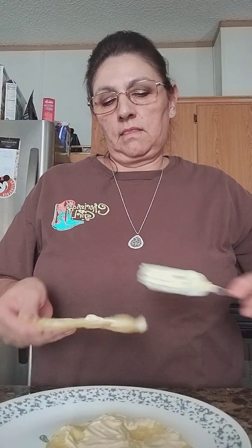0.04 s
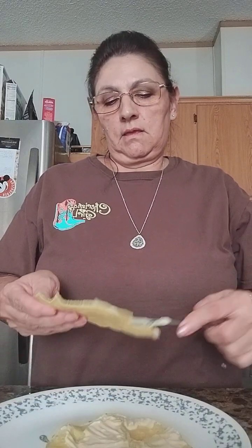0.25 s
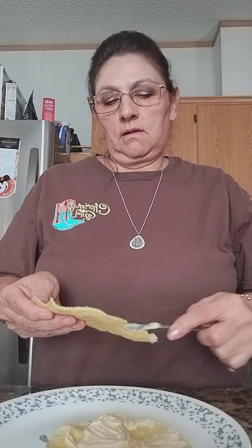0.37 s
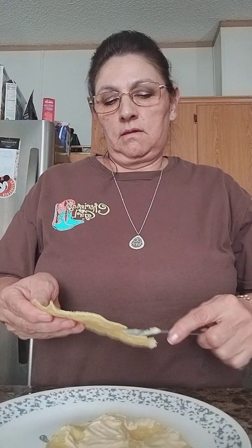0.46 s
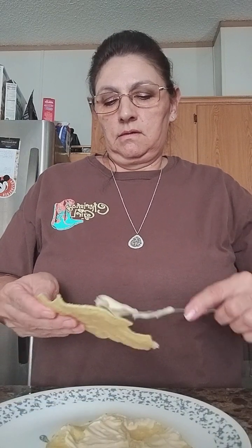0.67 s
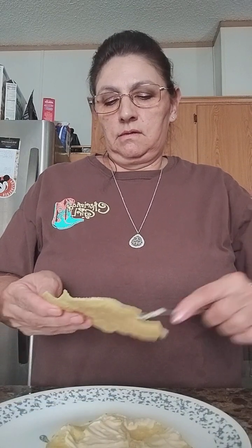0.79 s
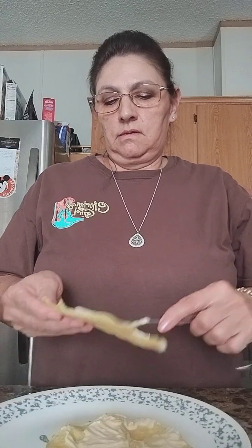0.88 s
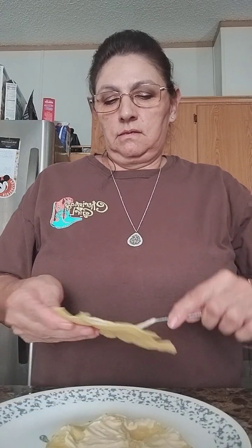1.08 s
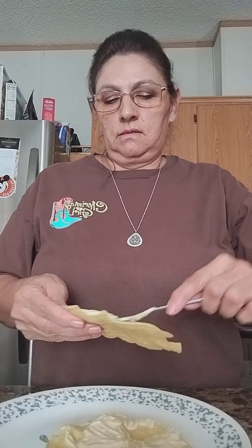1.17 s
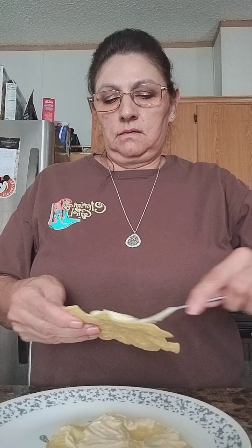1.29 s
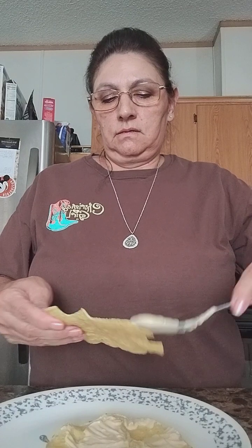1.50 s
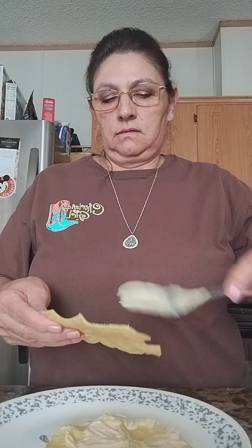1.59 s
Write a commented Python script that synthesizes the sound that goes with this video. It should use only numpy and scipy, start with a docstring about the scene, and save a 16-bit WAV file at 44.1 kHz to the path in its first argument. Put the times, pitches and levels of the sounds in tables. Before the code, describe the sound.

Close up in a small kitchen, quick spoon strokes rasp a brittle fried shell, stop briefly, then return softer with tiny crumb ticks and a sharp snap near the end, over low air noise.

```python
"""Short strokes of a metal spoon spread a soft paste over a crisp fried shell, close to a phone in a kitchen.
Each stroke is a rush of tiny catches that sound the shell, ring the spoon and hiss as grit. Crumbs snap as
short noise bursts, paste crackles as sparse ticks, the spoon's edge rasps through high resonances and the
shell flexes with dull bumps of low noise. The small room answers briefly, over steady low noise and hum."""
import sys
import numpy as np
from scipy import signal
from scipy.fft import rfft, irfft
from scipy.io import wavfile
from scipy.ndimage import uniform_filter1d

SR = 44100
rng = np.random.default_rng(int(sys.argv[2]) if len(sys.argv) > 2 else 0)


def to_wav(sig):
    """Store sig (one row per channel, or 1-D mono) as 16-bit WAV at the path in sys.argv[1].

    Samples outside -1..1 are clipped; the rate is SR.
    """
    pcm = np.clip(np.atleast_2d(sig), -1, 1) * 32767
    pcm = np.round(pcm).astype(np.int16)
    wavfile.write(sys.argv[1], SR, pcm.T)  # frames by channels


N = 72765

# bright colour of snapping crumbs and paste ticks: (frequency [Hz], relative level [dB])
TICK_SPECTRUM = [(1000, -18), (4000, -27), (5500, -8.5), (7200, -1), (8800, 5), (10500, -4.5), (12500, -17),
                 (16000, -14.5)]


def undb(db):
    """Decibels to gain."""
    return 10 ** (np.asarray(db) / 20)


def unit(x):
    """Scale to rms 1."""
    return x / np.sqrt(np.mean(x ** 2))


def times():
    """Time of each sample in seconds."""
    return np.arange(N) / SR


def freqs():
    """Frequencies of the filter grid in Hz."""
    return np.arange(N + 1) * SR / (2 * N)


def spectrum(x):
    """Spectrum on the filter grid, padded so that filters do not wrap round."""
    return rfft(x, 2 * N)


def through(x, response):
    """Filter by a frequency response."""
    return irfft(spectrum(x) * response)[..., :N]


def colour(points):
    """Causal (minimum-phase) response through (Hz, dB) points."""
    hz, db = np.array(points, float).T
    level_db = np.interp(np.log(freqs() + 1), np.log(hz), db)
    cepstrum = irfft(np.log(undb(level_db)))
    # folding the cepstrum forward in time makes the response causal
    cepstrum[1:N] *= 2
    cepstrum[N + 1:] = 0
    return np.exp(rfft(cepstrum))


def resonate(modes):
    """Summed response of damped resonances; a wider one dies away sooner."""
    s = 1j * freqs()
    return sum(undb(db) * s * width / (s * s + s * width + hz * hz) for hz, width, db in modes)


def normal(response):
    """Scale a response so that it keeps the power of white noise."""
    return response / np.sqrt(np.mean(np.abs(response) ** 2))


def roll_off(hz, order=4):
    """Smooth (Butterworth) low-pass response of even order."""
    s, response = 1j * freqs() / hz, 1
    for k in range(order // 2):
        damping = 2 * np.sin(np.pi * (2 * k + 1) / (2 * order))
        response = response / (s * s + damping * s + 1)
    return response


def shifted(response, semitones):
    """The same response, moved up or down in pitch."""
    return np.interp(freqs() / 2 ** (semitones / 12), freqs(), response)


def swell(at, width):
    """A smooth bell in time; width is its standard deviation in seconds."""
    return np.exp(-.5 * ((times() - at) / width) ** 2)


def background():
    """Low air noise and appliance hum; the noise is alike at both ports in the bass and spreads above."""
    # colour of the air noise: (frequency [Hz], relative level [dB])
    air_spectrum = [(25, -31), (45, -15), (62, -8.5), (80, -3.5), (110, -6), (150, 0.5), (230, -1),
                    (380, 4), (480, -7.5), (800, -7), (1500, -15), (3000, -17), (6000, -29), (9000, -25),
                    (12000, -32.5), (16000, -33)]
    # appliance hum: (frequency [Hz], level [dB])
    hum_tones = [(120, -78.5), (240, -71.5)]
    air_db, wide_hz, left_db = -63.5, 800, -3.0

    t, tone = times(), normal(colour(air_spectrum))
    apart = freqs() / (freqs() + wide_hz)
    mid = through(rng.standard_normal(N), tone)
    side = through(rng.standard_normal(N), tone * apart)
    air = undb(air_db) * np.array([undb(left_db) * (mid + side), mid - side])
    hum = sum(undb(db) * np.sqrt(2) * np.sin(2 * np.pi * (hz * t + rng.random())) for hz, db in hum_tones)
    return air + hum


def snaps(shell):
    """Brief fractures: each noise burst gives a bright tick and a knock in the shell."""
    # crumb snaps and paste ticks: (time [s], tick level [dB], shell knock level [dB])
    snap_events = [(.119, -41, -44), (0.243, -38, -24.5), (.252, -46.5, -55), (.371, -59.5, -54),
                   (.389, -39.5, -25), (.709, -56, -49), (.759, -49, -26.5), (.774, -56, -49),
                   (.822, -41.5, -55), (.837, -44.5, -75), (.8445, -58, -49), (.961, -42, -35),
                   (.975, -44.5, -38), (1.005, -41, -39), (1.0335, -49, -47), (1.078, -46, -56),
                   (1.086, -52, -47), (1.1525, -37.5, -88), (1.1665, -33, -71), (1.1745, -42, -45),
                   (1.268, -59, -62), (1.3062, -27.5, -51)]
    decay_s, shell_top_hz = 0.0014, 4270

    t, ticks, knocks = times(), 0, 0
    for start, tick_db, knock_db in snap_events:
        burst = rng.standard_normal(N) * (t >= start) * np.exp(-np.abs(t - start) / decay_s)
        # every burst gets the same energy: rms 1 over one decay time
        burst = burst * np.sqrt(decay_s * SR / np.sum(burst ** 2))
        ticks = ticks + undb(tick_db) * burst
        knocks = knocks + undb(knock_db) * burst
    bright = through(ticks, normal(colour(TICK_SPECTRUM)))
    return bright + through(knocks, normal(shell * roll_off(shell_top_hz)))


def catches():
    """Dense tiny impulses of uneven size and random sign, bunched by the judder of the spoon."""
    catches_per_s, spread_db = 9000, 4
    judder_points_per_s, judder_db = 259.5, 2

    hit = rng.random(N) < catches_per_s / SR
    sign = np.sign(rng.standard_normal(N))
    size = undb(spread_db * np.clip(rng.standard_normal(N), -2, 2)) * sign
    judder = np.interp(times() * judder_points_per_s, np.arange(N), rng.standard_normal(N))
    x = hit * size * undb(judder_db * judder)
    # even out the level over 16 ms, so that only quicker bunching stays
    local_power = np.abs(uniform_filter1d(x ** 2, size=700))
    return x / np.sqrt(local_power + 1e-9)


def scrapes(shell):
    """Each stroke swells, holds and lets go; its catches sound the shell, the spoon and the grit."""
    # strokes: (start [s], attack [s], hold [s], release to 1/e [s], shell level [dB], shell roll-off [Hz],
    # hollow knock level [dB], spoon ring level [dB], grit level [dB],
    # shift of the resonances with grip and contact point [semitones])
    strokes = [ (.176, .012, 0.018, 0.01, -60, 3500, -70, -59.5, -67, -0.61),
               (0.201, 0.013, 0.0059, 0.013, -34, 3680, -58, -45, -42.5, -0.13),
               (0.215, 0.02, 0.018, 0.0036, -37, 4120, -33.5, -29, -30, -0.38),
               (0.261, 0.013, .012, 0.0081, -32, 3520, -43.5, -36, -39.5, -0.16),
               (0.313, 0.0083, 0.0092, 0.0044, -48, 2670, -48.5, -61.5, -73, -0.84),
               (0.352, .012, 0.012, 0.015, -29.5, 4800, -50, -23, -38, -0.13),
               (0.7335, 0.0077, 0.01, 0.012, -36.5, 3580, -41.5, -53.5, -58.5, -0.84),
               (0.773, 0.0015, 0.0093, 0.017, -40.5, 3300, -39, -62, -54.5, 0.43),
               (.812, 0.0025, 0.0037, 0.017, -49, 2900, -66, -54.5, -56, 0.79),
               (0.854, 0.026, 0.016, .010, -59, 4100, -67, -61.5, -74, 0.0051),
               (0.912, 0.015, 0.026, 0.024, -59.5, 3570, -63, -58.5, -63, 0.95),
               (0.953, 0.005, .003, 0.02, -41, 2850, -37, -55.5, -54, 0.12),
               (1.029, 0.0017, 0.025, 0.0047, -45, 2470, -55, -61, -69, -1.28),
               (1.084, 0.00088, 0.0075, .011, -45, 2700, -65, -56, -54, -1.3),
               (1.142, 0.017, 0.017, .010, -56.5, 3600, -85, -53.5, -48.5, -0.28),
               (1.203, .001, 0.0019, 0.0032, -45, 2060, -72, -50, -71, 0.17),
               (1.217, 0.013, 0.062, 0.0073, -61, 2230, -65, -58.5, -56, 0.48),
               (1.291, 0.038, 0.02, 0.01, -37.5, 5970, -47.5, -47, -41, 0.88),
               (1.338, 0.028, 0.018, 0.011, -37.5, 2840, -56, -46.5, -45, 1.2)]
    # resonances of the hollow and of the spoon: (frequency [Hz], width [Hz], relative level [dB])
    hollow_modes = [(523, 38, -13), (790, 43, -1), (796, 39, 11.5), (806, 49, -12)]
    spoon_modes = [(1054, 17, -11.5), (2748, 34.1, -10.5), (2880, 40, -10), (3120, 97, -4), (3350, 86, -3),
                   (3815, 130, -2.5), (3935, 92, 4), (4054, 120, -4.5), (4480, 87, -20.5)]
    # hiss of the grit: (frequency [Hz], relative level [dB])
    grit_spectrum = [(1000, -40), (4000, -30.5), (5600, -22.5), (6600, -2.5), (8600, 6.5), (9900, 0),
                     (11000, -10), (13000, -16.5), (16000, -25)]
    # share of the scraping that both ports hear alike, capped at 0 dB, as the catches scatter over the
    # shell's surface: (frequency [Hz], level [dB])
    alike_share = [(100, 0.2), (300, -.5), (700, -0.5), (2000, -2.6), (4000, -3.5), (9000, -31)]
    attack_power, hollow_top_hz, spoon_top_hz = 1.54, 1540, 6430

    t, out = times(), 0
    hollow = normal(resonate(hollow_modes) * roll_off(hollow_top_hz, order=2))
    spoon = normal(resonate(spoon_modes) * roll_off(spoon_top_hz, order=2))
    grit = normal(colour(grit_spectrum))
    # two independent streams each, to be mixed for the two ports
    friction = np.array([catches(), catches()])
    rim = np.array([catches(), catches()])
    for start, attack, hold, release, shell_db, soft_hz, hollow_db, spoon_db, grit_db, shift in strokes:
        age = t - start
        rise = np.clip(age / attack, 0, 1) ** attack_power
        force = rise * np.exp(-np.maximum(age - attack - hold, 0) / release)
        # paste cushions the contact and dulls the shell
        soft_shell = normal(shifted(shell, shift) * roll_off(soft_hz, order=6))
        body = undb(shell_db) * soft_shell + undb(grit_db) * grit
        ring = shifted(undb(spoon_db) * spoon + undb(hollow_db) * hollow, shift)
        out = out + spectrum(force * friction) * body + spectrum(force * rim) * ring
    alike = np.minimum(np.abs(colour(alike_share)), 1)
    left = alike * out[0] + np.sqrt(1 - alike ** 2) * out[1]
    return irfft(np.array([left, out[0]]))[:, :N]


def bumps():
    """The shell flexes against the fingers with dull swells of low noise."""
    # bumps: (time [s], width [s], level [dB])
    flexes = [(.31, 0.024, -57), (.41, 0.027, -56.5), (.825, 0.024, -58), (1.038, 0.028, -61),
              (1.362, 0.043, -56)]
    # colour of a bump: (frequency [Hz], relative level [dB])
    flex_spectrum = [(30, -22.5), (70, -8.5), (110, -10), (190, 2.5), (300, -4), (600, -22.5),
                     (2000, -65.5)]

    push = sum(undb(db) * swell(at, width) for at, width, db in flexes)
    return through(push * rng.standard_normal(N), normal(colour(flex_spectrum)))


def rasp():
    """The spoon's edge bites: its catches excite thin, high resonances."""
    # bites of the edge: (time [s], width [s], level [dB])
    bites = [(0.365, 0.0052, -34.5), (1.286, 0.0046, -51), (1.322, 0.01, -43)]
    # resonances of the rasp: (frequency [Hz], width [Hz], relative level [dB])
    edge_modes = [(4510, 300, -1.5), (5140, 250, 0.5), (5660, 200, -1.5), (6420, 440, -5.5)]

    bite = sum(undb(db) * swell(at, width) for at, width, db in bites)
    return through(bite * catches(), normal(resonate(edge_modes) * roll_off(hz=7500)))


def crackle():
    """Paste clinging to the spoon crackles in sparse, uneven tiny ticks."""
    # spans of crackling: (start [s], end [s], level [dB])
    spans = [(0.804, 1.056, -60), (1.137, 1.30, -65)]
    ticks_per_s, spread_db = 470, 9

    t = times()
    size = undb(spread_db * np.clip(rng.standard_normal(N), -2, 1.5))
    ticks = unit((rng.random(N) < ticks_per_s / SR) * size)
    contact = sum(undb(db) * (t > start) * (t < end) for start, end, db in spans)
    return through(contact * ticks, normal(colour(TICK_SPECTRUM)))


def kitchen(x):
    """Direct sound, near scatter and a short room tail at two ports; the left one is later and shaded."""
    # echo against direct sound: (frequency [Hz], level [dB])
    echo_spectrum = [(100, -27.5), (400, -3.5), (1200, -6), (3000, -6), (4200, -8.5), (6000, -12),
                     (9000, -12.5), (16000, -7.5)]
    # what the far (left) microphone port hears against the near one: (frequency [Hz], level [dB])
    far_port = [(100, -1.5), (380, -3), (750, -10), (1300, -5), (2400, -2.5), (3000, -4.5), (3900, -10),
                (4900, -4.5), (6200, -16.5), (8300, -31.5), (11000, -22.5), (15000, -10)]
    bass_t60_s, treble_t60_s, split_hz, room_delay_s = 0.22, 0.26, 4845, 0.0028
    # scatter from hands, plate and counter; longer waves pass round them
    early_db, early_s, early_from_hz = -0.5, 0.0011, 2700
    port_lag_s = 0.00034
    t = times()

    def scatter(envelope):
        """Response of dense echoes: shaped noise, independent at the two ports."""
        return normal(spectrum(rng.standard_normal((2, N)) * envelope))

    def tail(t60):
        """Echoes that fall by 60 dB in t60 seconds."""
        return scatter((t > room_delay_s) * undb(-60 * t / t60))

    bass = np.abs(roll_off(split_hz, order=2))
    treble = np.sqrt(1 - np.minimum(bass, 1) ** 2)
    room = colour(echo_spectrum) * (bass * tail(bass_t60_s) + treble * tail(treble_t60_s))
    small_objects = freqs() / (freqs() + early_from_hz)
    early = undb(early_db) * small_objects * scatter(t * np.exp(-t / early_s))
    direct = np.array([np.exp(-2j * np.pi * freqs() * port_lag_s), np.ones(N + 1)])
    shade = np.array([np.abs(colour(far_port)), np.ones(N + 1)])
    return through(x, (direct + early + room) * shade)


def scene():
    """Strokes, snaps and the smaller sounds of one shell and spoon, in the kitchen."""
    # broad colour of the shell: (frequency [Hz], relative level [dB])
    shell_spectrum = [(40, -33), (100, -10.5), (250, -8.5), (500, -9), (1100, -0.5), (1600, -3),
                      (2100, -2.5), (2900, -7), (3600, 7.5), (4500, -3), (5600, -9), (9000, -39),
                      (16000, -59)]
    # resonances of the shell: (frequency [Hz], width [Hz], relative level [dB])
    shell_modes = [(1160.4, 25, 5), (1357, 80, -25), (1484, 50, 2.5), (1978, 170, -2), (2092, 62, -4),
                   (2238, 58, 4.5), (2680, 70, 1.5), (2734, 41, 12), (3180, 150, -29.5)]
    broad_db = -2.5  # unresonant part beside the resonances

    shell = colour(shell_spectrum) * (undb(broad_db) + resonate(shell_modes))
    close = snaps(shell) + scrapes(shell) + bumps() + rasp() + crackle()
    return kitchen(close) + background()


def record(dry):
    """The phone cuts the top steeply above 15.9 kHz."""
    top_cut = signal.ellip(10, .2, 70, 15900, fs=SR, output="sos")
    return signal.sosfilt(top_cut, dry)


dry = scene()
out = record(dry)
to_wav(out)
```